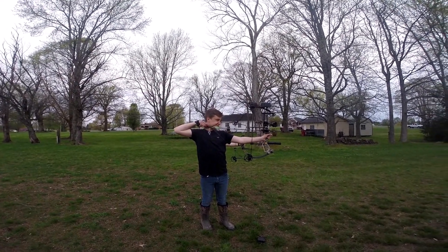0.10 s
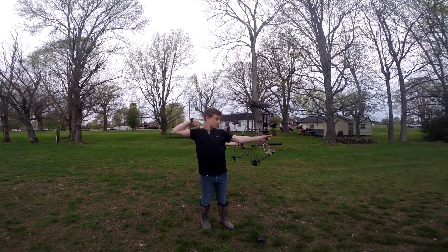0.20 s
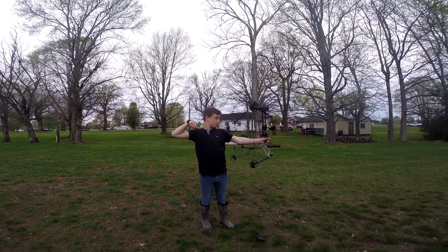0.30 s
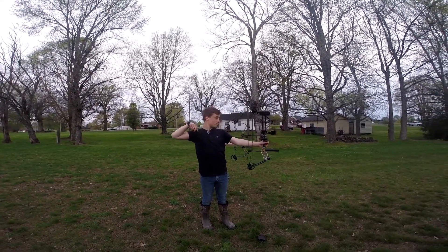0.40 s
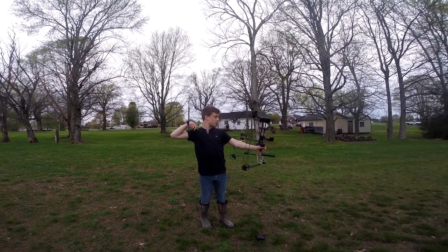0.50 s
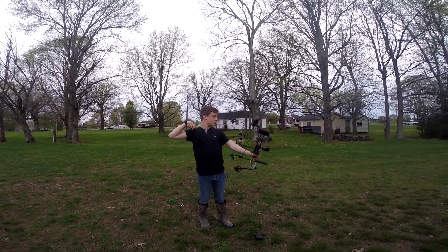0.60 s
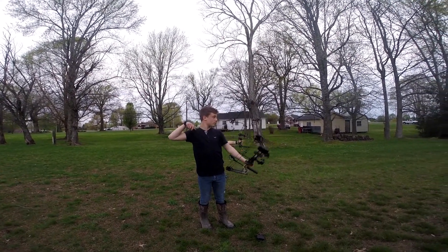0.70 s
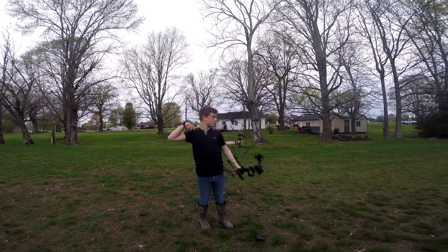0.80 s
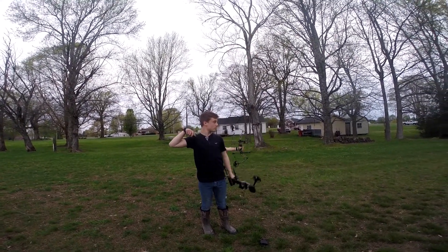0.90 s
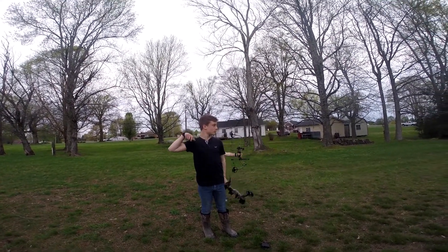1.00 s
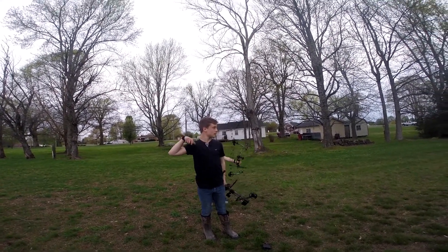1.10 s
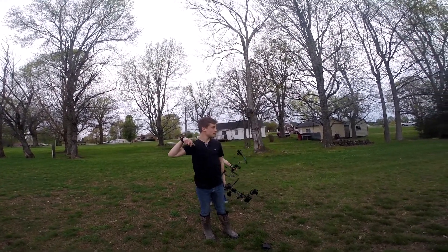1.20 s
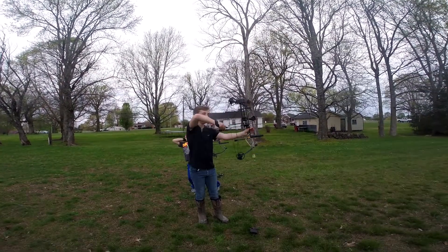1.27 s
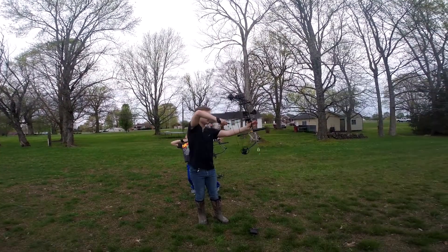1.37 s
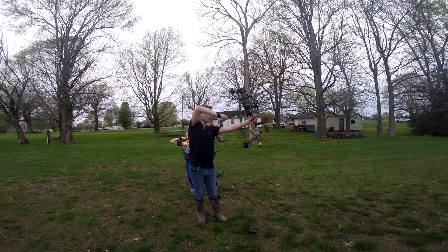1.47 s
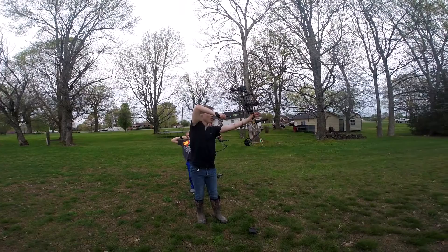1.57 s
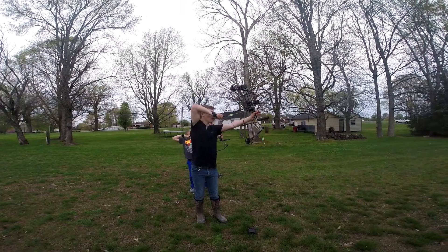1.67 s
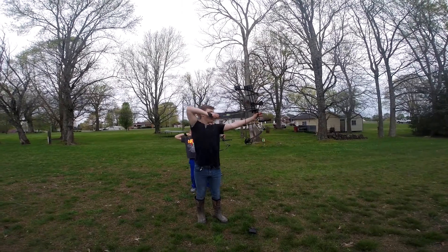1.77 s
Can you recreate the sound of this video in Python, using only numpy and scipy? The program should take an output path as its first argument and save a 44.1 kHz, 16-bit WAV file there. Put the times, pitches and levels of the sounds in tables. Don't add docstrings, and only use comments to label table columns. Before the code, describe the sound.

Two compound bow shots crack with rattling metal and whipping string, each answered about a third of a second later by an arrow thud in foam; open lawn with faint traffic, single-channel pickup.

```python
import sys
import numpy as np
from scipy import signal
from scipy.fft import rfft, irfft
from scipy.io import wavfile

SR = 44100
rng = np.random.default_rng(int(sys.argv[2]) if len(sys.argv) > 2 else 0)


def makeup_ratio(level_db):
    decades = np.asarray(level_db, float) / 20
    return 10 ** decades


def transcribe(u):
    v = np.clip(np.atleast_2d(u).T, -1, 1)
    q = np.round(v * 32767).astype(np.int16)
    wavfile.write(sys.argv[1], SR, q)


N = 79380
T = np.arange(N) / SR
BETWEEN_SHOTS_S = .5

SLAP_S = [.2280, .2308, .2376, .2425, .2518, .2670, .2755, .2465, .2580, .2700, .2820, .2910, .8545, .8565,
          .8612, .8685]
# [body level/dB, rattle level/dB]
SLAPS = [(-8.5, -23.5), (-25.5, -18), (-21.5, -16.5), (-19.5, -23.5), (-17.5, -18), (-26, -30), (-31, -32),
         (-25.5, -26), (-32.5, -28.5), (-39, -30), (-38.5, -35.5), (-39.5, -41), (-19, -31.5), (-15.5, -22),
         (-32, -31), (-35, -31.5)]
THUD_S = [
    .5034,
    .5106,
    .5355,
    1.1949,
    1.2020,
]


def rms_one(x):
    return x / np.sqrt(np.mean(x ** 2) + 1e-20)


def passed(x, hz, kind, order=2):
    return signal.sosfilt(signal.butter(order, hz, kind, fs=SR, output="sos"), x)


def lows_in_phase(x, hz):
    return signal.sosfiltfilt(signal.butter(3, hz, fs=SR, output="sos"), x)


def band_noise(low_hz, high_hz):
    return rms_one(passed(rng.standard_normal(N), [low_hz, high_hz], "band"))


def coloured(spectrum):
    hz, db = np.transpose(spectrum)
    log_hz, log_f = np.log(hz), np.log(np.maximum(np.fft.rfftfreq(N, 1 / SR), 1))
    outside = np.maximum(log_hz[0] - log_f, 0) + np.maximum(log_f - log_hz[-1], 0)
    shape = makeup_ratio(np.interp(log_f, log_hz, db) - 18 * outside)
    return rms_one(irfft(rfft(rng.standard_normal(N)) * shape, N))


def in_time(rows):
    s, *columns = np.transpose(rows)
    return [np.interp(T, s, column) for column in columns]


def drift(rate):
    r = np.exp(-80 * np.pi * rate / SR)
    slow = signal.lfilter([1], [1, -2 * r, r * r], rng.standard_normal(N // 40 + 2002))[2000:]
    return np.interp(np.arange(N) / 40, np.arange(len(slow)), rms_one(slow))


def ring(times, heights, hz, t60):
    clicks = np.full(N, 1e-18)
    np.add.at(clicks, (np.asarray(times) * SR).astype(int), heights)
    r, w = makeup_ratio(-60 / (t60 * SR)), 2 * np.pi * hz / SR
    return signal.lfilter([0, np.sin(w)], [1, -2 * r * np.cos(w), r * r], clicks)


def burst(s, db, rise, t60):
    swell_db = 9.4 * (T - s) / max(rise, 1e-4)
    return makeup_ratio(db + np.where(T < s, swell_db, -60 * (T - s) / t60))


def lobe(s, width):
    return np.cos(np.pi / 2 * np.clip((T - s) / width, -1, 1)) ** 2


def limbs():
    # [f/Hz, first shot level/dB, second shot level/dB, t60/s]
    limb_modes = [(268, -12, -7.5, 0.088), (395, -13, 1, 0.022), (483, -10, -46, 0.15),
                  (530, -8, -12, 0.041), (690, -24.5, 2.5, 0.011), (781, -8.5, 1.5, 0.057),
                  (900, 3.5, -16, 0.026), (1004.6, -5, -9, 0.073), (1100, -5, -3, 0.033),
                  (1527, -17.5, -18, 0.018)]
    s, body_db = np.array(SLAP_S), np.transpose(SLAPS)[0]
    body = 0
    for k, (hz, first_db, second_db, t60) in enumerate(limb_modes):
        mode_db = np.where(s < BETWEEN_SHOTS_S, first_db, second_db) - 4.5
        scatter_db = 1.5 * rng.standard_normal(len(s))
        body = body + (-1) ** k * ring(s, makeup_ratio(body_db + mode_db + scatter_db), hz, t60)
    return passed(passed(body, 3300, "low"), 220, "high")


def cams():
    # [f/Hz, first shot level/dB, second shot level/dB, t60/s]
    cam_modes = [(1980, -8.5, -15, .015), (2320, -7.5, -7, 0.016), (2816, -0.5, -10.5, 0.025),
                 (3290, -7, -3, .01), (3600, -12.5, -5, .012), (4400, -5.5, -3, .012),
                 (4840, -7, -12, 0.013), (5100, -2.5, -2, 0.01), (5710, 3, 0, 0.012),
                 (5960, -0.5, -5, 0.011), (6950, -15, -9.5, .008), (7900, -10.5, -14, .009),
                 (8590, -9, -4, 0.011)]
    s, rattle_db = np.array(SLAP_S), np.transpose(SLAPS)[1]
    out = 0
    for hz, first_db, second_db, t60 in cam_modes:
        times = (s[:, None] + rng.uniform(0, .0012, (len(s), 3))).ravel()
        mode_db = np.where(s < BETWEEN_SHOTS_S, first_db, second_db) - 8
        heights = np.repeat(makeup_ratio(rattle_db + mode_db), 3) * rng.uniform(.6, 1.19, times.size)
        out = out + ring(times, heights * rng.choice([-1, 1], times.size), hz, t60)
    return out


def string_rush():
    # [t/s, level/dB, rise/s, f/Hz]
    rushes = [
        (0.223, -33, 0.0073, 1070),
        (0.2266, -34, 0.0025, 2660),
        (.8475, -49, .004, 1112),
        (0.851, -39, 0.0035, 2800),
    ]
    return sum(burst(s, db, rise, 0.027) * band_noise(0.75 * hz, 1.15 * hz) for s, db, rise, hz in rushes)


def string_whip():
    # [t/s, level/dB, rise/s, t60/s]
    whips = [
        (0.23, -21, 0.0023, 0.13),
        (0.2362, -32.5, 0.0016, 0.056),
        (0.253, -37.5, 0.00099, 0.069),
        (0.2745, -39.5, 0.0016, 0.19),
        (0.8546, -24.5, 0.0011, 0.054),
        (0.8679, -32, 0.0023, 0.015),
        (0.8758, -50, 0.0025, 0.27),
    ]
    # [f/Hz, level/dB]
    whip_colour = [(900, 6), (1600, -0.5), (2700, 1), (4000, -5.5), (5700, -3.5), (8500, -10.5),
                   (11000, -20.5), (15000, -29.5)]
    flutter, noise = makeup_ratio(1.0 * drift(160)), coloured(whip_colour)
    since_slap = np.maximum(T - np.where(T < BETWEEN_SHOTS_S, SLAP_S[0], SLAP_S[-3]), 0)
    dull = lows_in_phase(noise, 6780)
    dulling_db_per_s = 129.5
    noise = dull + (noise - dull) * makeup_ratio(-dulling_db_per_s * since_slap)
    return flutter * noise * sum(burst(*w) for w in whips)


def thrum():
    # [t/s, level/dB, start f/Hz, end f/Hz, hold/s]
    hums = [
        (0.228, -18.5, 390, 479, 0.04),
        (.264, -34.5, 468.7, 477, 0.076),
        (0.8548, -28.5, 415, 478, 0.032),
    ]
    rise_s, sag_db, t60_s = 0.0016, 6.5, 0.025
    out = 0
    for s, db, start_hz, end_hz, hold in hums:
        along = np.clip((T - s) / hold, 0, 1)
        hz = start_hz + (end_hz - start_hz) * along ** 2 * (3 - 2 * along)
        turn = 2 * np.pi * np.cumsum(hz * (T > s)) / SR
        fade_db = -sag_db * along * hold / 0.039 - 60 * np.maximum(T - s - hold, 0) / t60_s
        out = out + np.clip((T - s) / rise_s, 0, 1) * makeup_ratio(db + fade_db) * np.sin(turn)
    return out


def ticks():
    # [t/s, level/dB, f/Hz, t60/s]
    touches = [(0.2124, -30, 7450, 0.0099), (0.2124, -41.5, 9800, 0.008), (0.2122, -41, 5800, 0.008),
               (0.2143, -36.5, 14810, .005), (0.24, -34.5, 7350, .010), (0.2166, -42.5, 3000, .008),
               (0.647, -37, 5560, 0.0023), (0.46, -38, 3840, 0.0027), (0.6472, -35, 2140, 0.004),
               (.729, -50.5, 5900, .006), (.868, -47.5, 5300, 0.086), (1.2, -41.5, 5000, .012),
               (1.2, -49, 6200, .006), (1.0775, -56, 8000, .005), (0.9008, -41, 4100, .005),
               (0.99, -43, 5010, .009), (0.96, -50, 5700, 0.0042), (1.722, -39, 4700, 0.003),
               (1.7215, -43.5, 3160, 0.0069)]
    return sum(passed(ring([s], makeup_ratio(db), hz, t60), [.88 * hz, 1.12 * hz], "band")
               for s, db, hz, t60 in touches)


def target():
    # [push level/dB, recoil level/dB, recoil lag/s, width/s]
    pushes = [
        (-5.5, -5.5, 0.00079, 0.00066),
        (-19, -44, 0.0035, 0.00091),
        (-23, -28, 0.001, 0.001),
        (-10, -8, 0.00074, 0.00073),
        (-25, -57, .0013, 0.00082),
    ]
    # [f/Hz, first arrow level/dB, second arrow level/dB, t60/s]
    block_modes = [(81, -41, -25, 0.04), (393, -33, -16.5, 0.019), (957, -42, -22, 0.038),
                   (1874, -9.5, -24, 0.0049), (2800, -27, -50.5, .008), (3610, -21, -17, 0.0055),
                   (4430, -33, -46, .004), (5170, -45.5, -46, .005), (5860, -28, -51, 0.0052),
                   (6140, -50, -43, .008), (6970, -31.5, -55, .006), (7430, -51, -27, 0.006),
                   (8470, -45, -29.5, 0.0054), (10020, -46.5, -53, .007), (11700, -50.5, -56, .007),
                   (13560, -70, -52, .005)]
    out = 0
    for s, (push_db, recoil_db, lag, width) in zip(THUD_S, pushes):
        out = out + makeup_ratio(push_db) * lobe(s, 0.61 * width) - makeup_ratio(recoil_db) * lobe(s + lag, 0.78 * width)
    hits = np.array([THUD_S[0], THUD_S[3]]) - .00028
    for k, (hz, first_db, second_db, t60) in enumerate(block_modes):
        polarity = (-1) ** (max(k, 2) + 1)
        tone = ring(hits, polarity * makeup_ratio(np.array([first_db, second_db])), hz, t60)
        band = [hz - min(0.26 * hz, 547), hz + min(0.28 * hz, 547)]
        out = out + passed(tone, band, "band")
    return passed(out, 14000, "low")


def echoes():
    # [t/s, level/dB, rise/s, t60/s]
    tails = [
        (0.506, -28.5, 0.00092, 0.064),
        (0.534, -38, 0.005, 0.76),
        (0.646, -45.5, 0.0016, 0.13),
        (1.2, -38.5, 0.00055, 0.088),
        (1.322, -50, 0.019, 0.068),
    ]
    # [f/Hz, level/dB]
    echo_colour = [(200, 6), (500, 5), (1100, 6), (2000, -6.5), (3300, -12.5), (6000, -20), (10000, -34)]
    # [f/Hz, level/dB]
    rustle_colour = [(1500, -3), (2600, 7), (4500, 11), (5600, -1), (8000, -5.5), (11000, -21)]
    # [t/s, level/dB, rise/s, t60/s, f/Hz]
    swells = [
        (.522, -39, .003, .04, 1150),
        (.538, -40.5, .008, 0.076, 1100),
        (.56, -52.5, 0.014, 0.053, 3200),
        (.585, -44, .012, 0.076, 1140),
        (.599, -43, .003, .03, 1260),
        (.648, -39, .001, 0.027, 900),
        (.66, -39.5, .004, 0.053, 1100),
        (.685, -40.5, .006, .04, 947),
        (1.197, -27, 0.00056, .025, 996),
    ]
    out = sum(burst(*shape) * band_noise(.88 * hz, 1.12 * hz) for *shape, hz in swells)
    out += passed(coloured(echo_colour), 11900, "low", order=6) * sum(burst(*e) for e in tails[:-1])
    return out + coloured(rustle_colour) * burst(*tails[-1])


def squeak():
    # [t/s, f/Hz, level/dB]
    line = [
        (1.48, 6700, -82),
        (1.51, 7150, -71),
        (1.56, 7350, -68.5),
        (1.6, 7450, -68),
        (1.65, 7250, -71),
        (1.7, 7200, -72),
        (1.74, 7200, -67),
    ]
    hz, db = in_time(line)
    turn = 2 * np.pi * np.cumsum(hz * (1 + 0.0121 * drift(60.2))) / SR
    drawing = (T > line[0][0]) & (T < line[-1][0])
    lines = np.sin(turn) + makeup_ratio(2) * np.sin(.70 * turn)
    return makeup_ratio(db - 1.5) * drift(120) * drawing * lines


def birds():
    # [t/s, length/s, start f/Hz, end f/Hz, level/dB]
    bird_notes = [
        (1.05, 0.046, 8100, 8850, -72.5),
        (1.105, .04, 8950, 8850, -75),
        (1.13, .055, 8850, 8700, -66),
        (1.35, 0.061, 3650, 3900, -64),
        (.762, 0.044, 3150, 3150, -66),
        (1.09, .03, 3350, 3350, -60),
        (1.5, .08, 7900, 7600, -70),
        (1.5, .07, 5150, 5150, -64),
    ]
    wobble = 2.2 * drift(60.1)
    out = 0
    for s, length, hz, end_hz, db in bird_notes:
        mean_hz = hz + (end_hz - hz) * (T - s) / (2 * length)
        tone = np.sin(2 * np.pi * mean_hz * (T - s) + wobble)
        out = out + makeup_ratio(db) * lobe(s + length / 2, length / 2) * tone
    return out


def air():
    # [t/s, rumble level/dB, traffic level/dB, leaves level/dB]
    swell = [(0, -45.5, -46, -58), (.2, -43, -49, -57.5), (.4, -43.5, -48.5, -57.5), (.55, -42, -46.5, -65),
             (.68, -43.5, -51, -57.5), (.75, -44, -47.5, -60), (.95, -43, -47.5, -55),
             (1.201, -46, -46, -59), (1.33, -52, -52, -67.5), (1.45, -48, -48.5, -65),
             (1.6, -47.5, -46, -60), (1.78, -43.5, -47.5, -60)]
    # [f/Hz, level/dB per Hz]
    rumble = [(25, -14.5), (55, -4.5), (95, -1), (118, 1.5), (150, -10), (220, -8.5), (300, -15.5),
              (420, -19)]
    traffic_before = [(300, -13.5), (450, -12), (700, -4.5), (1000, -0.5), (1400, -4.5), (2000, -13),
                      (2800, -21.5)]
    traffic_after = [(300, -15.5), (540, -11), (680, -3), (850, -0.5), (1200, -3.5), (1600, -15),
                     (2000, -18), (2700, -25.5)]
    leaves = [(1800, 8), (2500, -6), (3300, 3.5), (4200, -6), (5500, -2.5), (7000, -10), (9000, -15),
              (15000, -23.5)]
    # [t/s, depth 0-1]
    dips = [
        (.783, .95),
        (1.103, .92),
        (1.637, .88),
    ]
    traffic = np.where(T < 1.27, coloured(traffic_before), coloured(traffic_after))
    out = 0
    for db, noise, flicker_db in zip(in_time(swell), (coloured(rumble), traffic, coloured(leaves)), (1.5, 1.2, 1.1)):
        out = out + makeup_ratio(db + flicker_db * drift(15.8)) * noise
    out = signal.sosfilt(signal.cheby2(14, 60, 15200, fs=SR, output="sos"), out)
    low = lows_in_phase(out, 2000)
    dip = sum(depth * lobe(s, .010) ** .5 for s, depth in dips)
    return low + (out - low) * (1 - dip)


def whine():
    # [f/Hz, level/dB rms]
    whine_lines = [(11719, -78.5), (14626, -77)]
    return sum(makeup_ratio(db + 2.0 + 2.5 * drift(28.5)) * np.sin(2 * np.pi * hz * T) for hz, db in whine_lines)


def scene():
    bow = limbs() + cams() + string_rush() + string_whip() + thrum() + ticks()
    arrow = target() + echoes()
    return (bow + arrow + squeak() + birds() + air() + whine())[None]


def low_pass(x):
    return signal.sosfilt(signal.butter(12, 16320, fs=SR, output="sos"), x)


def record(dry):
    # [t/s, gain level/dB]
    fade = [
        (1.2215, -1),
        (1.2235, -19.5),
        (1.25, -54),
        (1.29, -52.5),
        (1.30, -29),
        (1.316, -4),
        (1.33, -1.5),
    ]
    gain_db, = in_time(fade)
    return low_pass(passed(dry, 15400, "low", order=10) * makeup_ratio(gain_db))


dry = scene()
out = record(dry)
transcribe(out)
```